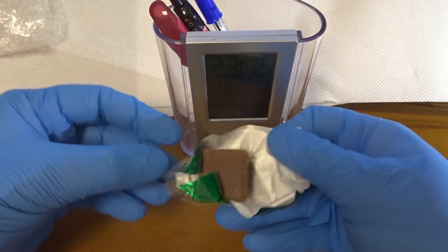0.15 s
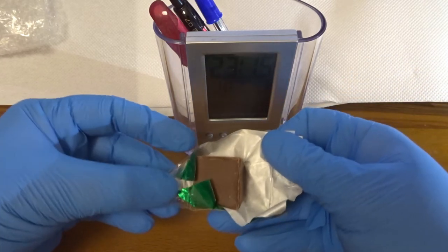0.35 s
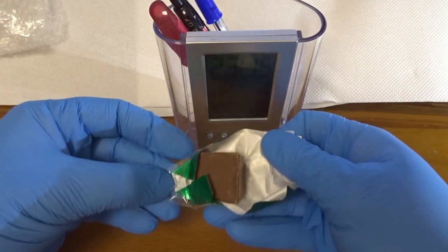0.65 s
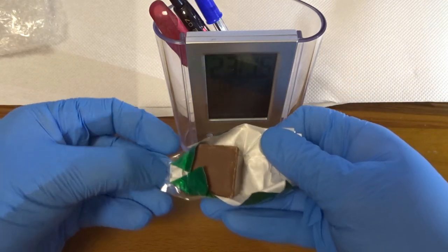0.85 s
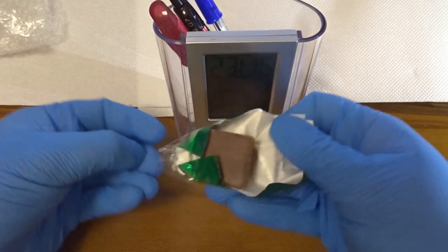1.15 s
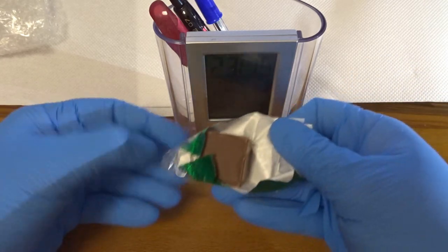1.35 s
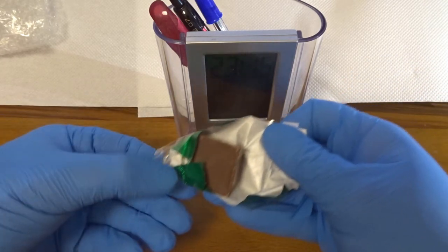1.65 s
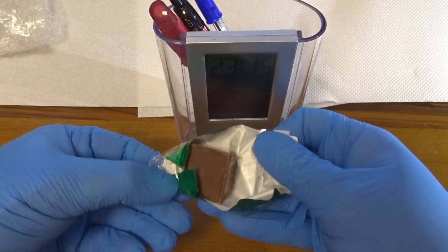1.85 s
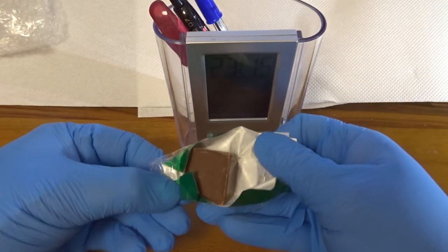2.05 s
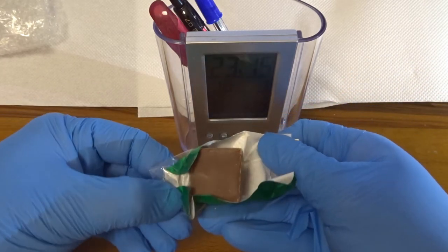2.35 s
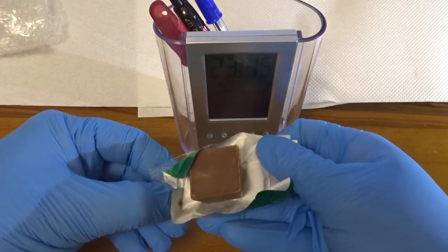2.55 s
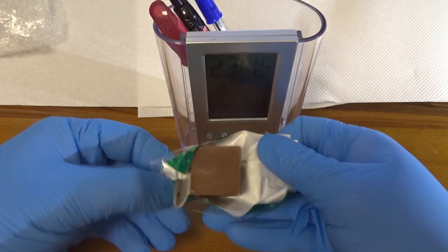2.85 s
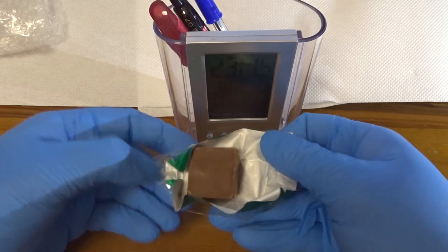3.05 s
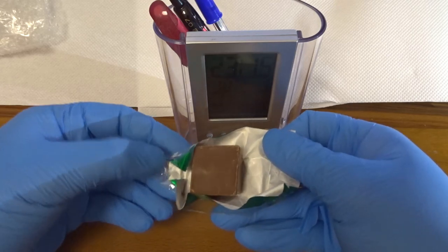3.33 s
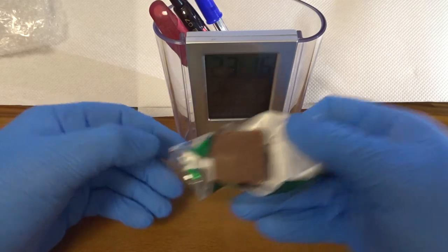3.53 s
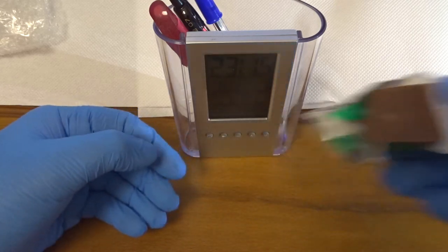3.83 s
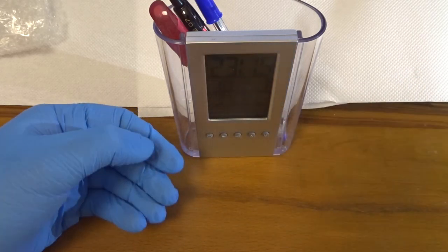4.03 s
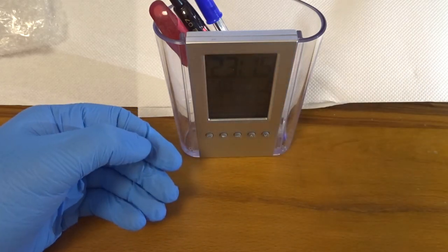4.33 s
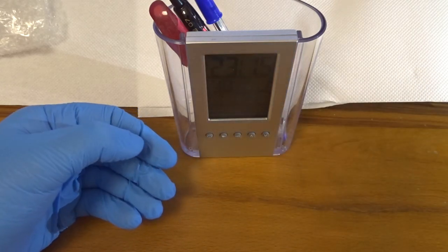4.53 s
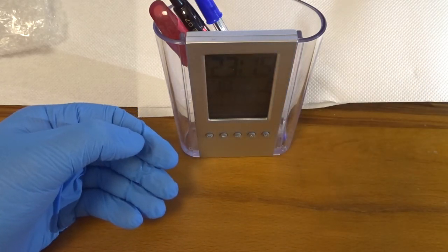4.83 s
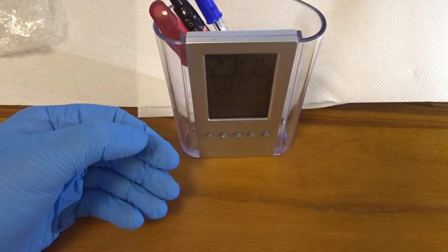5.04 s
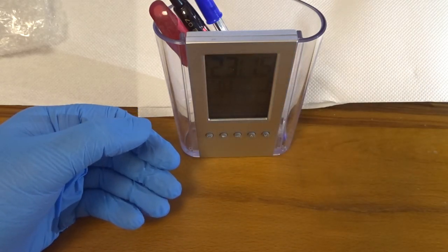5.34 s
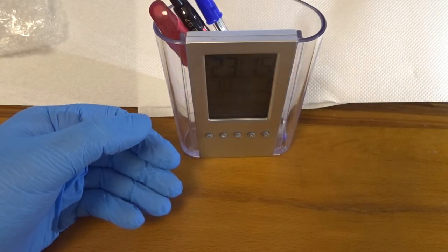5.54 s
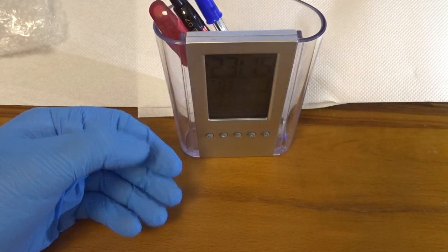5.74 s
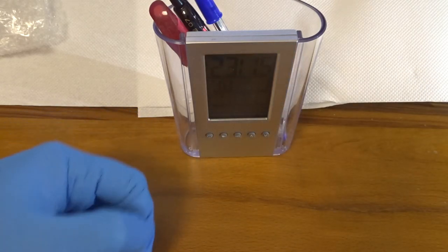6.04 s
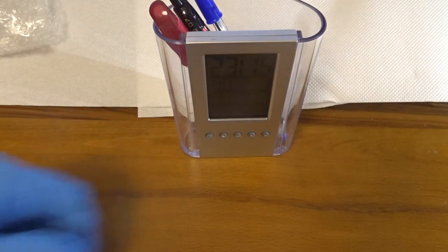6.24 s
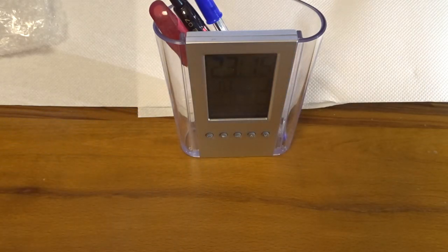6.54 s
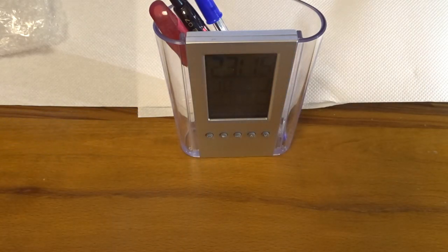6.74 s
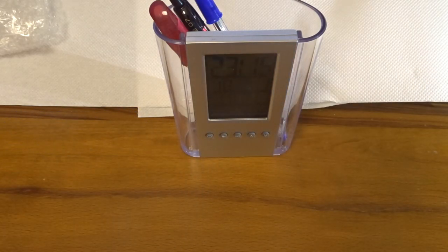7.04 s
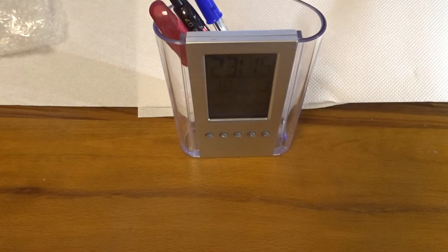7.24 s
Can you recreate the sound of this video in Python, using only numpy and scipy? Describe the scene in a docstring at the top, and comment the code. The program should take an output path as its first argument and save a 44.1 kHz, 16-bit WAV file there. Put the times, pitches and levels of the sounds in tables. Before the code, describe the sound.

A thin foil wrapper crinkles in uneven bursts near a stereo microphone, its creases giving way with bright little snaps that grow busier and then die down. After a short lull, crumpling starts with a slightly hollow ring, followed by one light, hollow tap. A final flurry of crackles has a bit more room sound. The small room is otherwise quiet, with a faint steady hiss.

```python
"""A small quiet room, where gloved hands unwrap and crumple thin foil close to a stereo microphone.
Creases buckle with short snaps over a rustle of tiny ones, and the air pocket in the folded wrapper
rings with them. Something small and hollow is tapped once. The room answers with a short tail.
Underneath lies a steady bed of airy hiss with a few broad bumps and a faint hum."""
import sys
import numpy as np
from scipy import signal
from scipy.fft import rfft, irfft
from scipy.io import wavfile
from scipy.ndimage import uniform_filter1d

SR = 44100
rng = np.random.default_rng(int(sys.argv[2]) if len(sys.argv) > 2 else 0)


def waveform_to_disk(signal):
    """Save audio, clipped to [-1, 1], as 16-bit WAV at the path in sys.argv[1]."""
    frames = np.transpose(np.atleast_2d(signal))
    scaled = np.clip(frames, -1, 1) * 32767
    samples = np.round(scaled).astype(np.int16)
    wavfile.write(sys.argv[1], SR, samples)


N = 325458

# Creases that buckle, plus the noisy attack of the hollow tap at 5.656 s. Each row: start in seconds,
# level in dB, ring in Hz, bass in dB, treble in dB, length of the jerks in ms.
SNAP_HITS = [(0.1051, -24.5, 3840, -11.5, -6.5, 2.6), (0.421, -34.5, 1310, -3.5, 0.5, 2.7),
             (0.46, -23, 6450, -13, 1, 4.9), (0.4685, -27.5, 1330, 8.5, 6, 6.7),
             (.475, -29, 3800, -20, 1, 4), (.516, -34, 3980, 1, -3, 2.3),
             (0.5275, -22.5, 5700, -10, -.5, 1.2), (0.5733, -19, 3130, -19, -2.5, 2.5),
             (0.5869, -20.5, 6030, -3, 8, 0.5), (0.6093, -20, 5840, -27, 2, 2.1),
             (.6265, -30, 9500, -17, 4, 1.2), (0.6372, -20.5, 6160, -16, -5, 2.9),
             (0.6448, -23, 7640, -21, 1, 0.86), (0.6881, -22.5, 3380, -3.5, 3.5, 2.4),
             (0.6966, -27, 4100, -14, -10, 4.1), (0.7698, -28, 2540, -9, -13, 2.2),
             (0.822, -40, 3940, -16, -15, 2), (0.8393, -14.5, 4400, -6.5, -6, 3.2),
             (0.8635, -22.5, 5000, -11, -9, 2.6), (0.8992, -19, 4320, -23, -6, 1.6),
             (.9196, -15.5, 3680, -14, -8, 1.5), (.931, -23.5, 4870, -10, -4, 3.4),
             (.9777, -17, 5750, -8, -6, 1.5), (0.9857, -26, 3800, -5.5, -11, 1.2),
             (1.0394, -19, 3800, -24, -9.5, 2.7), (1.076, -31.5, 4690, -4, -8, 2.2),
             (1.0966, -33, 3810, -15, -15, 1.7), (1.1095, -27, 4000, -7, -2, 3),
             (1.1129, -13.5, 4650, -2, 1, 2.7), (1.12, -20.5, 4800, -14, -7, 5),
             (1.1406, -27.5, 3470, -9, -3, 5.6), (1.1822, -25, 2430, -16, -12, 2.6),
             (1.349, -32, 3700, -29, -4.5, 0.67), (1.4051, -46.5, 940, 7, -4.5, 4.3),
             (1.4582, -30, 3560, -9, -8.5, 2.7), (1.5382, -25, 4850, -15.5, -8, 3.3),
             (1.5635, -30, 3570, -10, -11.5, 2), (1.6007, -32.5, 2600, -17, -18, 3.5),
             (1.7052, -46, 6180, -11, -4, 2.5), (1.773, -35, 4630, 8, 2, 3.8),
             (1.7779, -24.5, 5260, -31, -7, 1.1), (1.781, -23.5, 5660, -5, -3, 3.3),
             (1.8036, -24.5, 3000, -15, -8.5, 1.8), (1.9021, -22, 5100, -6, 0, 2.6),
             (1.936, -29, 4500, -10, -4, 2.7), (1.939, -17.5, 5000, -8.5, 1, 2.5),
             (1.9661, -21.5, 3830, -19, -5, 1.4), (1.9846, -29, 3900, -24, 7, 1.3),
             (1.9975, -24, 5750, -20, -9, 0.89), (2.0038, -27, 4100, -4, -4, 1.9),
             (2.0168, -31, 4590, -11, 0, 2.9), (2.0492, -28.5, 5150, -0.5, -2, 2.4),
             (2.0628, -32.5, 4700, -18, -5, 1.5), (2.077, -28, 6960, -13, 7, 1.7),
             (2.1407, -31.5, 4030, -6, -3, 0.9), (2.1499, -28, 3300, 5, 3, 1.1),
             (2.1543, -22.5, 3160, 3, -9, 3.2), (2.1895, -22.5, 4030, -2, -1.5, 1.5),
             (2.218, -16, 3720, 5.5, 6.5, 2.7), (2.2455, -15.5, 2700, 0.5, -2.5, 1.8),
             (2.2502, -20, 4820, -19, -3, 1.1), (2.2682, -19, 3400, -9, -10.5, 2.4),
             (2.2864, -14.5, 3420, -15, -8, 1.07), (2.3108, -21, 9350, -15, -7, 0.5),
             (2.317, -15.5, 3880, -5.5, -1, 2.1), (2.3441, -11, 5670, -15, -6.5, 1.5),
             (2.374, -26.5, 2480, -16, -8, 2.9), (2.387, -19.5, 3170, 1.5, -3.5, 3),
             (2.4815, -12.5, 3420, -22, -5.5, 0.91), (2.489, -15, 2680, -8, -4, 2.9),
             (2.5025, -16.5, 5500, -3, -8, 1.5), (2.5054, -12.5, 5580, -8, -7.5, 1.2),
             (2.5197, -14, 6890, 2, -4.5, 1.9), (2.527, -22, 6010, -16, -3, 2.6),
             (2.5341, -11, 2400, -11, -5.5, 4.1), (2.5771, -24, 5100, -20, 2, 1.1),
             (2.638, -35.5, 3920, 0, 1, 1.3), (2.652, -43.5, 3790, 4, -11, 3.5),
             (2.7426, -42, 4030, -22, -4, 2.7), (2.762, -43, 4500, -15, -6, 5),
             (2.7967, -34.5, 5140, 2.5, 0.5, 2.6), (2.812, -40, 5770, -9, -6, 5),
             (2.8443, -21.5, 1660, 12.5, -6.5, 2.4), (2.8637, -22, 1710, -3, -7, 1.6),
             (2.8773, -13.5, 6040, 0.5, 0.5, 2.8), (2.9418, -24.5, 1470, 0, -4, 6.4),
             (2.9475, -14.5, 6000, -11, -5, 0.61), (2.9682, -29, 930, 13, -8, 1.9),
             (2.988, -36.5, 1390, 8, -15, 2.3), (3.164, -48.5, 1750, -5, -13, 3.4),
             (3.337, -44.5, 1630, 5, -21, 4.5), (3.3992, -37, 1240, -4, -20, 3.3),
             (3.585, -52, 5000, 0.1, -9, 2.3), (3.612, -51, 1730, 14, -13, 3.8),
             (4.653, -24.5, 6850, 0, -4, 4.7), (4.6668, -23.5, 1210, 11, 2, 4.1),
             (4.6985, -30.5, 2990, 1, -6, 6.5), (4.7548, -34, 1260, 9, -9, 10),
             (4.763, -24, 4890, -25, -13, 5.2), (4.777, -26.5, 4450, 2, -3.5, 3),
             (4.8396, -16, 6050, 0.5, 3.5, 4.4), (4.848, -23, 1260, -2, -1, 5.3),
             (4.9333, -26, 1150, 5.5, 4.5, 4.9), (4.9527, -35, 5380, 6, 13, 5.5),
             (4.9994, -34.5, 1190, 14, -12, 7.7), (5.0198, -23, 4760, -21, -13, 2.5),
             (5.038, -27, 6940, -13, -3, 4.1), (5.0744, -35, 1130, 12, -3, 5.7),
             (5.0921, -20.5, 7140, -34, -3, 1.34), (5.0939, -26, 1160, 11, -2, 5.1),
             (5.1333, -17, 1200, -4, -6.5, 4.9), (5.2007, -34.5, 2710, 8, -4, 4.5),
             (5.3088, -25, 4800, -9, -2.5, 4.1), (5.3695, -17, 4230, -8, -11.5, 1.4),
             (5.3716, -19, 3050, -7, -8, 2), (5.4349, -19.5, 4130, -6, 0.5, 5.2),
             (5.4878, -26.5, 1780, -0.5, -8, 4.6), (5.509, -23, 5100, -10, 3, 3.9),
             (5.5634, -32, 1900, -1, -9, 5.5), (5.5763, -30, 1830, -5, 3, 4.5),
             (5.5827, -25.5, 6960, -5, 0, 2.9), (5.5903, -24, 1700, -4, -9, 5),
             (5.656, -33.5, 770, 14, 8, 11), (5.819, -44.5, 1640, 18, -7, 3.5),
             (5.968, -29.5, 1610, -5.5, -11.5, 5.9), (6.0104, -35, 4940, -12, -9, 3.7),
             (6.285, -48, 5880, -15, -4, 3.2), (6.736, -37.5, 3300, 4, -8, 9),
             (6.7706, -31.5, 3450, 0, 0, 6.9), (6.7842, -33.5, 2600, -11, -17, 4.7),
             (6.838, -38, 786, 15, -21, 16), (6.8477, -16.5, 2770, 4.5, 1, 4.9),
             (6.856, -23, 2470, -10, -5, 10), (6.8719, -19.5, 3180, -15, -4.5, 4),
             (6.9148, -19.5, 3430, -1, -7, 4.9), (6.9457, -23, 2060, -1.5, -1.5, 5),
             (6.971, -16.5, 6100, 0, 1.5, 4.5), (6.991, -19, 3680, 1.5, -6.5, 6.5),
             (7.005, -22.5, 3380, -9, -21, 5.7), (7.0948, -28.5, 1550, 8, -1, 6.5),
             (7.1059, -23.5, 1670, -6, -18, 7.6), (7.1262, -21, 3050, -6, -19, 5.6),
             (7.2136, -27.5, 2760, -19, -10, 6), (7.2625, -33.5, 2150, -13, -18, 4.1),
             (7.3457, -33.5, 3730, -7, 1, .9), (7.3561, -34.5, 3180, -9, -10, 2.7)]
# Thin foil radiates little bass. Each row: frequency in Hz, snap gain in dB.
SNAP_LOW_CUT = [(30, -24.5), (350, -33), (550, -19.5), (800, -4.5), (1100, 0.5)]
# Where the snaps sit. Each row: time in seconds, left over right in dB.
SNAP_PAN = [(0.5, 1), (2.5, -0.5), (4.7, 1), (7, 4)]
# The air pocket in the folded wrapper. Each row: time in seconds, resonance in Hz.
POCKET_PITCH = [(5.15, 1210), (5.4, 1065), (6.6, 786), (7.0, 780), (7.1, 1100)]
# Stereo image of the close foil. Each row: frequency in Hz, left-right likeness.
FOIL_LIKENESS = [(150, 0.88), (700, 0.97), (2500, 0.82), (8000, 0.61)]
# Finger movements on the foil. Each row: start in seconds, hold in seconds, rustle level in dB,
# brightness in dB per octave, pocket ring in dB relative to the rustle.
FINGER_MOVES = [(0.228, 0.31, -60.5, 2.2, -16), (0.547, 0.11, -53, 1, -15), (0.853, 0.07, -50.5, 0, -5.5),
                (1.086, 0.062, -50, -1.1, -11), (1.535, .06, -58.5, -1.2, -30),
                (1.779, 0.033, -51.5, -0.5, -16), (1.928, .07, -49.5, -0.5, -28),
                (2.133, .08, -55.5, -0.5, -18.5), (2.253, 0.067, -41.5, 0, -34),
                (2.504, 0.047, -45.5, .6, -18), (2.734, .1, -62, 1, -14.5), (2.878, 0.062, -45, -2, -17),
                (3.335, 0.055, -59, -2.2, -18), (4.678, 0.013, -41, -1, -5.5), (4.76, 0.054, -57, 0.1, -5),
                (4.826, 0.23, -48.5, 1, -3), (5.147, 0.044, -52, -0.5, -20), (5.386, .04, -44.5, -1.5, -14),
                (5.455, .17, -50, -0.6, -29), (5.98, .04, -57, -1, -28), (6.174, 0.11, -64.5, 2.5, -6),
                (6.744, 0.058, -53, -5, -34), (6.864, 0.15, -38, -1, -36), (7.091, 0.05, -35.5, 1, -27),
                (7.27, 0.12, -61, -3.5, -24)]
# Faint rustle of foil and gloves between movements. Each row: time in seconds, level in dB.
REST_LEVEL = [(0, -63), (1.3, -61.5), (1.7, -67), (3.2, -70), (3.8, -70), (4.6, -80), (5.3, -67),
              (5.85, -68.5), (6.4, -71.5), (6.7, -66)]
# Tone of the rustle. Each row: frequency in Hz, relative level in dB.
RUSTLE_EQ = [(120, -55), (200, -36), (520, -19.5), (791, -8), (2240, -5.5), (2470, -1.5), (2930, -5.5),
             (3400, -2), (11000, -10.5), (14300, -46), (22000, -120)]
# Where the rustle sits. Each row: time in seconds, left over right in dB.
RUSTLE_PAN = [(3, -3), (4.6, -0.8), (6.4, -0.5), (6.8, 0)]
# Modes of the tapped object. Each row: pitch in Hz, peak in dB, 60 dB decay in seconds, delay in ms.
TAP_MODES = [(817, -37.5, 0.1, 3.68), (1200, -44, 0.04, 4.14), (3822, -37.5, 0.037, .1),
             (5000, -35.5, 0.022, 0.14)]
# More room as the wrapper moves away. Each row: time in seconds, reverb send in dB.
ROOM_SEND = [(3.5, -9), (4.5, -7), (6.5, -6), (6.7, -1.5)]
# Length of the tail. Each row: frequency in Hz, 60 dB decay in seconds.
ROOM_DECAY = [(500, 0.12), (1300, 0.36), (3500, 0.23), (9000, 0.28)]
# Tone of the tail; soft furnishings absorb treble. Each row: frequency in Hz, relative level in dB.
ROOM_EQ = [(600, -8.5), (3000, -4), (9000, -5.5)]
# Stereo image of the tail. Each row: frequency in Hz, left-right likeness.
ROOM_LIKENESS = [(500, 0.7), (1500, 0.73), (4000, 0.032), (9000, 0.059)]
# Tone of the hiss. Each row: frequency in Hz, relative level in dB.
HISS_EQ = [(71, -66), (120, -20.5), (183, -17), (278, -21.5), (493, -6), (874, -7), (1210, -1.5),
           (1990, -11.5), (3660, -10), (7410, -13.5), (11500, -22.5), (15000, -43), (22000, -120)]
# Broad bumps in the hiss. Each row: centre in Hz, width in Hz, boost in dB.
HISS_BUMPS = [(458, 86, 3.5), (1248, 180, 2.5), (1720, 240, 12.5)]
# Stereo image of the hiss. Each row: frequency in Hz, left-right likeness.
HISS_LIKENESS = [(60, 0.92), (150, 0.79), (300, 0.74), (900, 0.2), (2600, 0.03)]
# The treble drops steeply above 11 kHz. Each row: frequency in Hz, gain in dB.
TREBLE_CUT = [(10800, -2), (11150, -12.5), (11350, -25.5), (12400, -36.5)]

POCKET_WIDTH_HZ = 266
GRIP_DB_PER_S, SETTLE_DB_PER_S = 472, 123  # attack and release of a finger movement
REST_DB_PER_OCTAVE, REST_POCKET_DB = -3.5, -16  # brightness and pocket ring between movements


def snap(hz, bass_db, treble_db, ms, pocket_hz, noise):
    """A few quick jerks, as when a crease lets go and rings the freed facet and the air pocket."""
    size = noise.shape[1]
    f, t_ms = np.fft.rfftfreq(size, 1 / SR), np.arange(size) / SR * 1000
    jerks = .6 * noise[:2] * (noise[2] > .9) * np.exp(-t_ms / (1.3 * ms)) * (t_ms < ms)
    jerks += 0.052 * noise[:2] * np.exp(-np.maximum(t_ms - ms, 0) / 4.1)  # the foil shivers briefly
    jerks[:, 4] = 1.02 * np.sign(noise[:2, 0])  # the opening click
    push = rfft(jerks)
    push /= np.sqrt(uniform_filter1d(abs(push) ** 2, size=25))  # broadly white: the facet adds colour
    push = rfft(irfft(push) * (np.arange(size) < size * .6))  # leave space to ring out
    low_cut_db = curve(SNAP_LOW_CUT, f * np.sqrt(POCKET_PITCH[0][1] / pocket_hz))  # big pocket, more bass
    tilt_db = curve([(1200, bass_db), (3400, 0.0074), (8000, treble_db)], f)
    facet_db = curve([(1000, 8), (3000, 9), (7000, 6)], hz) / (1 + ((f - hz) / (.12 * hz)) ** 2)
    pocket_db = 4.6 / (1 + ((f - pocket_hz) / (POCKET_WIDTH_HZ / 2)) ** 2)
    colour = minimum_phase(low_cut_db + tilt_db + facet_db + pocket_db)
    sound = irfft(stereo_pair(*push, curve(FOIL_LIKENESS, f)) * colour)
    return sound / np.sqrt((sound ** 2).mean(0).sum() / (SR / 1000))  # energy of 1 ms at rms 1


def snaps(scatter_db=1, size=1024):
    """The larger creases and the tap's noisy attack, each a little left or right of the hands."""
    out = np.zeros((2, N + size))
    for start, db, hz, bass_db, treble_db, ms in SNAP_HITS:
        noise = rng.standard_normal((3, size))
        sound = snap(hz, bass_db, treble_db, ms, automation(POCKET_PITCH, start), noise)
        pan_db = automation(SNAP_PAN, start) + scatter_db * noise[2, -1]
        at = round(start * SR)
        out[:, at:at + size] += gain_of(db) * panned(pan_db)[:, None] * sound
    return out[:, :N]


def handling(t):
    """Level, brightness and pocket ring under the fingers: powers add, the strongest sets the tone."""
    start, hold, db, brightness, pocket_db = np.array(FINGER_MOVES).T[:, :, None]
    attack_db = GRIP_DB_PER_S * np.maximum(start - t, 0)
    release_db = SETTLE_DB_PER_S * np.maximum(t - start - hold, 0)
    power = gain_of(db - attack_db - release_db) ** 2
    rest = gain_of(automation(REST_LEVEL, t)) ** 2
    total = power.sum(0) + rest
    brightness = ((power * brightness).sum(0) + rest * REST_DB_PER_OCTAVE) / total
    pocket_db = ((power * pocket_db).sum(0) + rest * REST_POCKET_DB) / total
    return 10 * np.log10(total), brightness, pocket_db


def rustle(per_s=800, spread_db=3.5, grain_ms=1.8, patchy_db=3.5):
    """Countless tiny creases give way as noise grains of shifting colour; the air pocket rings along."""
    t = np.arange(N) / SR
    ticks = gain_of(spread_db * np.minimum(rng.exponential(1, N), 4)) * (rng.random(N) < per_s / SR)
    grain_decay = np.exp(-t[:400] * 1000 / grain_ms) * (t[:400] < grain_ms / 500)
    bursts = np.sqrt(abs(signal.oaconvolve(ticks ** 2, grain_decay)[:N]))
    grains = bursts * rng.standard_normal((2, N))
    f, frame_s, spectra = signal.stft(grains, SR, nperseg=256, noverlap=192)
    f = f[:, None]
    flicker = gain_of(patchy_db * patches(spectra.shape[1:], bins=7, frames=4))
    level_db, brightness, pocket_db = handling(frame_s)
    colour = gain_of(curve(RUSTLE_EQ, f) + brightness * np.log2(np.clip(f, 500, 11000) / 3000))
    colour /= np.sqrt((colour ** 2).mean(0))
    spectra = stereo_pair(*spectra, curve(FOIL_LIKENESS, f)) * colour * flicker
    sound = unit_rms(signal.istft(spectra, SR, nperseg=256, noverlap=192)[1][:, :N])
    sound += gain_of(np.interp(t, frame_s, pocket_db)) * pocket_ring(grains[0], t)
    return sound * gain_of(np.interp(t, frame_s, level_db)) * panned(automation(RUSTLE_PAN, t))


def pocket_ring(grains, t):
    """Air in the folded wrapper rings like a gliding band-pass: shift to 0 Hz, smooth, shift back."""
    carrier = np.exp(2j * np.pi * np.cumsum(automation(POCKET_PITCH, t)) / SR)
    pole = np.exp(-np.pi * POCKET_WIDTH_HZ / SR)
    ring = (carrier * signal.lfilter([1], [1, -2 * pole, pole * pole], grains / carrier + 1e-18)).real
    return unit_rms(signal.sosfilt(signal.butter(4, 600, "high", fs=SR, output="sos"), ring))


def hollow_tap(start_s=5.6528):
    """A small hollow object rings in a few dying modes; the low ones speak a moment later."""
    out = np.zeros(N)
    for hz, db, t60, delay_ms in TAP_MODES:
        t = np.maximum(np.arange(N) / SR - start_s - delay_ms / 1000, 0)
        out += gain_of(db - 60 * t / t60) * np.sin(2 * np.pi * hz * t) * np.minimum(t * hz, 1)
    return out


def room_tail(first_ms=5.4, build_ms=5.2):
    """Sparse reflections build up after the first walls answer, each band dying at its own speed."""
    size, slot = SR // 2, 20  # in samples; one reflection a slot
    reflections = np.zeros((2, size))
    at = np.arange(0, size - slot, slot) + rng.integers(0, slot, (2, (size - 1) // slot))
    np.put_along_axis(reflections, at, rng.choice([-1., 1.], at.shape), 1)
    reflections *= np.clip((np.arange(size) / SR * 1000 - first_ms) / build_ms, 0, 1)
    hz, t, spectra = signal.stft(reflections, SR, nperseg=256)
    hz = hz[:, None]
    spectra = stereo_pair(*spectra, curve(ROOM_LIKENESS, hz))
    spectra *= gain_of(curve(ROOM_EQ, hz) - 60 * t / curve(ROOM_DECAY, hz))
    echoes = signal.istft(spectra, SR, nperseg=256)[1]
    return echoes / np.linalg.norm(echoes[0])


def room(close):
    """The reverb crossfades between two tails, so its colour keeps changing."""
    t = np.arange(N) / SR
    send = gain_of(automation(ROOM_SEND, t)) * close.mean(0)
    return sum(signal.fftconvolve((send * fade(20 * t))[None], room_tail(), axes=1)[:, :N]
               for fade in (np.sin, np.cos))


def hiss(level_db=-65.5, flicker_db=1.0):
    """A steady airy bed of noise, alike on both sides only in the bass."""
    hz = np.fft.rfftfreq(2048, 1 / SR)[:, None]
    shape = (len(hz), N // 512 + 5)
    real, imaginary = rng.standard_normal((2, 2, *shape))
    spectra = stereo_pair(*(real + 1j * imaginary), curve(HISS_LIKENESS, hz))
    bumps_db = sum(db / (1 + ((hz - centre) / (width / 2)) ** 4) for centre, width, db in HISS_BUMPS)
    spectra *= gain_of(curve(HISS_EQ, hz) + bumps_db + flicker_db * patches(shape, bins=20, frames=8))
    air = signal.istft(spectra, nperseg=2048, noverlap=1536)[1][:, :N]
    return gain_of(level_db) * air / np.std(air.mean(0))


def hum(hz=99.7, level_db=-94.5, waver_db=1.8):
    """A faint low tone whose level wavers a little."""
    waver = unit_rms(uniform_filter1d(rng.standard_normal(N), 5000))
    return np.sqrt(2) * gain_of(level_db + waver_db * waver) * np.sin(2 * np.pi * hz * np.arange(N) / SR)


def gain_of(db):
    """Decibels to amplitude."""
    return 10 ** (np.asarray(db) / 20)


def unit_rms(x):
    """Scales to rms 1."""
    return x / np.sqrt(np.mean(x ** 2) + 1e-20)


def curve(points, hz):
    """Reads a table on a log-frequency axis."""
    f, value = np.transpose(points)
    return np.interp(np.log(hz + 1), np.log(f + 1), value)


def automation(points, t):
    """Reads a table along the timeline."""
    return np.interp(t, *np.transpose(points))


def patches(shape, bins, frames):
    """Random flicker, smoothed over frequency and time."""
    return unit_rms(uniform_filter1d(uniform_filter1d(rng.standard_normal(shape), bins, 0), frames, 1))


def minimum_phase(db):
    """Spectrum of an EQ curve in dB that rings only after the hit."""
    log_gain = np.log(gain_of(np.maximum(db, -100)))
    phase = -signal.hilbert(np.concatenate([log_gain, log_gain[-2:0:-1]])).imag[:len(db)]
    return np.exp(log_gain + 1j * phase)


def panned(db):
    """Left and right gains for a level difference."""
    return gain_of(np.array([db, -db]) / 2)


def stereo_pair(mid, side, likeness):
    """Mid and side to left and right: likeness 1 is mono, 0 is wide."""
    likeness = np.clip(likeness, -1, 1)
    mid, side = np.sqrt((1 + likeness) / 2) * mid, np.sqrt((1 - likeness) / 2) * side
    return np.array([mid + side, mid - side])


def scene():
    """Foil and tap up close, their room tail, and the bed of hiss and hum."""
    close = snaps() + rustle() + hollow_tap()
    return close + room(close) + hiss() + hum()


def record(dry):
    """The treble drops steeply above 11 kHz, then a low-pass trims the top."""
    treble_cut = irfft(minimum_phase(curve(TREBLE_CUT, np.fft.rfftfreq(1024, 1 / SR))))
    heard = signal.oaconvolve(dry, treble_cut[None])[:, :N]
    low_pass = signal.firwin(511, cutoff=12392, window=("kaiser", 9), fs=SR)
    return signal.oaconvolve(heard, low_pass[None], "same")


dry = scene()
out = record(dry)
waveform_to_disk(out)
```